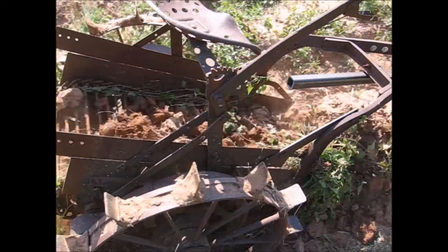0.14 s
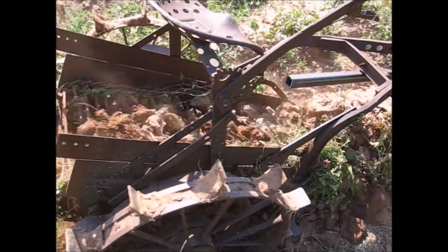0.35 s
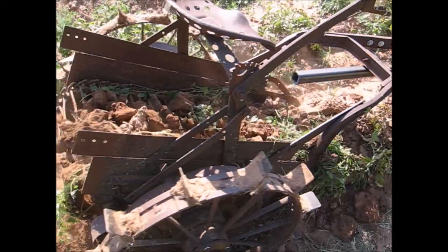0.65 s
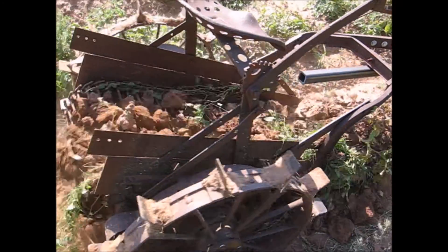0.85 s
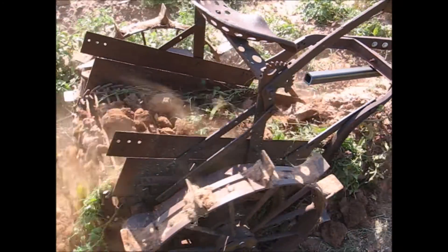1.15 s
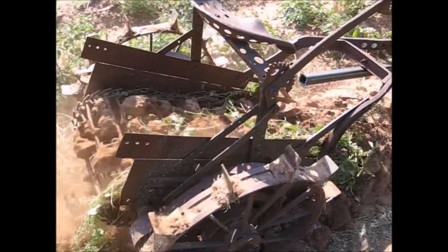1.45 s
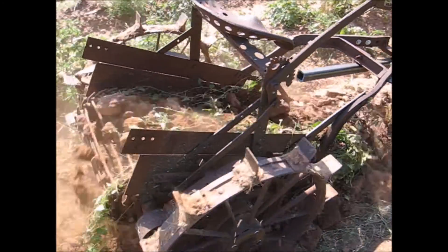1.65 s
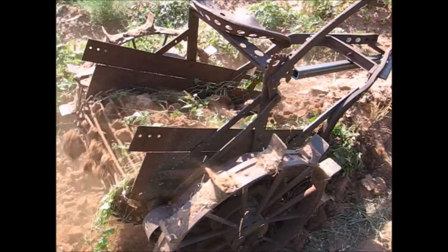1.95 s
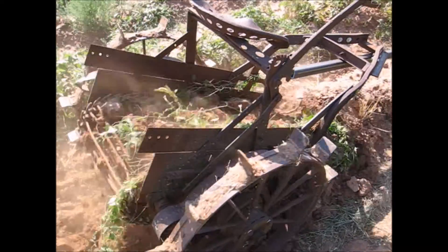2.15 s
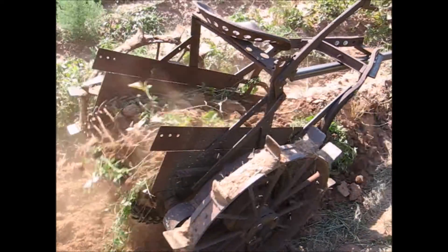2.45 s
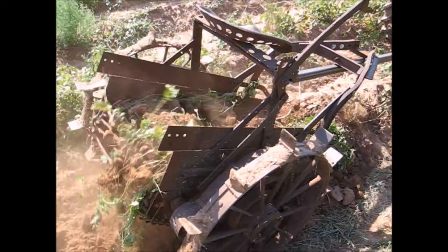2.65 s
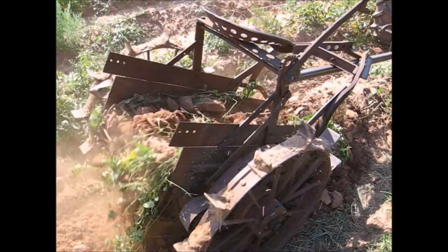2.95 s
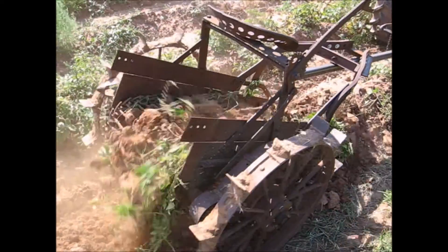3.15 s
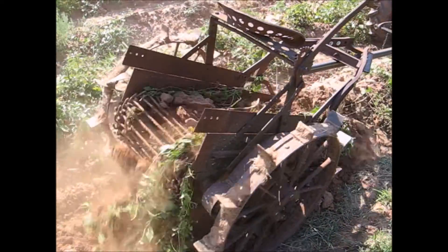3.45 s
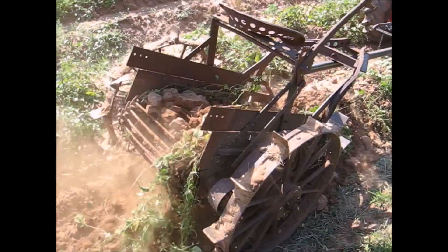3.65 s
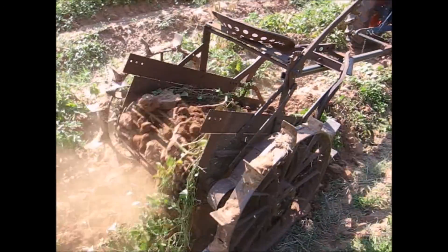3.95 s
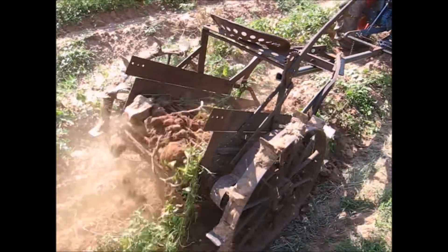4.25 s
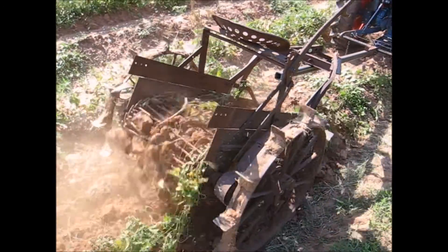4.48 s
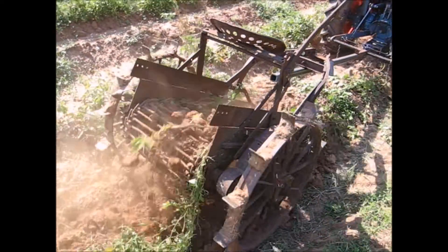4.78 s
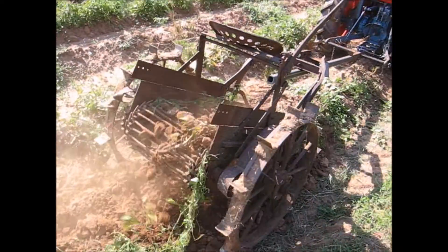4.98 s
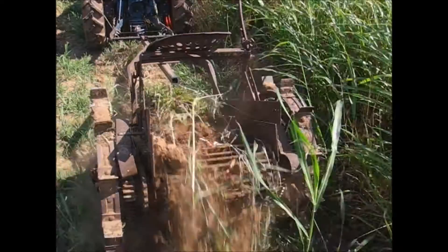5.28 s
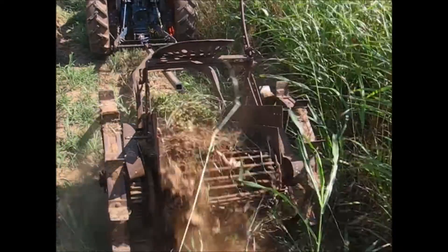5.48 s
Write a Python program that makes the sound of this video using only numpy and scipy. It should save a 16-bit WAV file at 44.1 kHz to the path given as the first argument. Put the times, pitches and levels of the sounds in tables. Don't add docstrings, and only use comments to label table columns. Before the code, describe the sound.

Gritty metallic chain rattle and irregular clanks, a shrill squeal returning with each wheel turn, low engine throb, wind rumble, then a closer view.

```python
import sys
import numpy as np
from scipy import signal
from scipy.fft import rfft, irfft, next_fast_len
from scipy.io import wavfile
from scipy.ndimage import uniform_filter1d, map_coordinates

SR = 44100
rng = np.random.default_rng(int(sys.argv[2]) if len(sys.argv) > 2 else 0)


def int16_out(signal):
    q = np.round(np.clip(np.atleast_2d(signal).T, -1, 1) * 32767)
    wavfile.write(sys.argv[1], SR, q.astype(np.int16))


def decibels_to_gain(level_db):
    exponent = np.asarray(level_db, float) / 20
    return 10 ** exponent


N = 247842
t = np.arange(N) / SR
CUT_S = 5.3069


def unit(x):
    return x / np.sqrt(np.mean(x ** 2) + 1e-20)


def curves(rows):
    times, *columns = np.transpose(rows)
    return [np.interp(t, times, column) for column in columns]


def wobble(rate):
    points = rng.standard_normal(int(N * rate / SR) + 4)
    return map_coordinates(points, [t * rate])


def filtered(x, response):
    m = next_fast_len(len(x))
    return irfft(rfft(x, m) * response(np.fft.rfftfreq(m, 1 / SR)), m)[:len(x)]


def coloured(x, points):
    hz, db = np.transpose(points)

    def response(f):
        return decibels_to_gain(np.interp(np.log(f + 1), np.log(hz), db, left=-90, right=-90))

    return unit(filtered(x, response))


def noise():
    return rng.standard_normal(N)


# (frequency [Hz], width [Hz], level [dB])
ROD_MODES = [(899, 38, 2), (1150, 80, -3), (1760, 45, -7.5), (2142, 120, 4.5), (2377, 77, 0.5),
             (2638, 65, 4.5), (2916, 37, 1), (3234, 65, 3.5), (3750, 60, -18.5), (3900, 160, -1.5),
             (4430, 43, -23), (4880, 65, -11)]


def rods(x, lean_db):
    f = np.fft.rfftfreq(next_fast_len(len(x)), 1 / SR)
    f = f[150 * len(x) // SR:6000 * len(x) // SR]
    response = 0
    for k, (centre, width, db) in enumerate(ROD_MODES):
        resonance = 1j * f * width / (centre * centre - f * f + 1j * f * width)
        response = response + (-1) ** k * decibels_to_gain(db + lean_db[k]) * resonance
    return filtered(x, lambda hz: np.interp(hz, f, response, left=0, right=0))


def chain(spectrum, level, grit, ring_db, spiky_db):
    spurts = decibels_to_gain(spiky_db * wobble(60) + 1.9 * wobble(400) + 2.4 * wobble(17))
    pebbles = (rng.random(N) < 110 / SR) * rng.uniform(0.17, 1, N)
    taps = signal.lfilter([1], [1, -.985], pebbles)
    soil = coloured((unit(spurts) + 0.42 * unit(taps) + 0.1) * noise(), spectrum)
    ring = np.zeros(N)
    for _ in range(4):
        knocks = noise() * decibels_to_gain(7.2 * np.clip(wobble(40), -2, 1.7))
        ring += unit(rods(knocks, 4.9 * rng.standard_normal(len(ROD_MODES))))
    rattle = soil + decibels_to_gain(ring_db) * unit(ring)
    top = filtered(rattle, lambda f: 1 / (1 + (3500 / (f + 1)) ** 10))
    return level * (rattle - top) + grit * unit(top)


# (frequency [Hz], level [dB per Hz])
SOIL_BESIDE = [(350, -12), (600, -0.5), (748, -1), (1670, -3.5), (1910, -9.5), (2160, -10), (3170, -10),
               (4540, -23.5), (4980, -19.5), (5410, -32), (7030, -59.5), (11900, -120)]
# (time [s], rattle level [dB])
SOIL_LOAD = [(0, -34.5), (.17, -26.5), (.27, -31.5), (.82, -33), (1.0, -26), (1.12, -33), (1.27, -29),
             (1.55, -33), (1.68, -26), (1.86, -33.5), (2.04, -31), (3.08, -33), (3.22, -26.5), (3.38, -35),
             (3.57, -26), (3.68, -33), (5.06, -32.5), (5.3, -36)]


def chain_beside(squeal_power):
    load_db, = curves(SOIL_LOAD)
    grit_db = -43.5 + 1.1 * (load_db - load_db.mean()) + 1.6 * wobble(14)
    grit = decibels_to_gain(grit_db) + decibels_to_gain(-31) * np.sqrt(squeal_power)
    return chain(SOIL_BESIDE, decibels_to_gain(load_db + 0.03), grit, ring_db=-6.5, spiky_db=0.5)


# (frequency [Hz], level [dB per Hz])
SOIL_REAR = [(88, -57), (150, -14), (308, -9), (353, -8), (513, -15), (545, -9.5), (855, -6), (1340, -12),
             (3200, -16), (4660, -16.5), (5410, -21.5), (7030, -59), (11900, -120)]


def chain_behind():
    return chain(SOIL_REAR, decibels_to_gain(-22), decibels_to_gain(-32.5), ring_db=-4.5, spiky_db=-1.0)


# (time [s], peak level [dB], ringing rod [Hz], brightness [dB])
LINK_BLOWS = [(0.1533, -6.5, 2080, -14), (0.2098, -20.5, 1076, -23), (0.2862, -18, 2590, -15.5),
              (0.334, -14.5, 1108, -18), (.602, -14, 1153, -15), (0.6693, -15, 1124, -15.5),
              (0.915, -6, 2650, -10.5), (0.9735, -13, 2555, -13), (1.0775, -22.5, 817, -23.5),
              (1.1444, -28.5, 916, -12.5), (1.5594, -26.5, 936, -2.5), (1.6462, -8, 3120, -6.5),
              (1.698, -13, 3024, -8), (1.7911, -15, 823, -17.5), (2.0004, -11, 1018, -14),
              (2.381, -17, 940, -20), (2.4236, -18.5, 2880, -14), (2.4685, -10, 843, -16),
              (2.8883, -22.5, 870, -20), (3.1652, -16.5, 874, -15), (3.5567, -20.5, 2384, -16),
              (3.6052, -23, 2360, -7.5), (3.9758, -13, 1760, -25), (4.017, -17, 856, -17),
              (4.2109, -12, 3170, -21.5), (4.2997, -25.5, 1260, -2.5), (4.6311, -11, 2488, -12.5),
              (4.965, -11, 3064, -10), (5.5129, -20.5, 3270, -12.5), (5.5807, -15.5, 827, -6)]
# (time [s], peak level [dB], ringing rod [Hz], thud [dB])
STONE_BLOWS = [(.1096, -20, 2120, -0.5), (.5541, -17, 1080, 3), (1.0144, -18, 1188, 0),
               (1.047, -22.5, 797, 5.5), (1.4044, -20.5, 1150, -1), (1.4411, -19, 1072, 2.5),
               (2.0438, -17.5, 1080, 8), (2.3374, -15.5, 938, 4), (2.8594, -16.5, 982, 1.5),
               (3.0964, -26.5, 1005, 0), (3.2375, -17.5, 987, -3), (3.5039, -13, 1097, -1.5),
               (3.6874, -26, 865, 4), (3.7758, -29.5, 920, -3), (3.9114, -18.5, 794, -3),
               (4.0814, -30, 810, 0.5), (4.3515, -21, 914, 6.5), (4.721, -17.5, 866, -10.5),
               (5.0315, -19, 780, 6), (5.0739, -20.5, 930, 3.5), (5.1168, -23.5, 820, 6),
               (5.3767, -10, 879, 0)]


def clanks():
    out, u = np.zeros(N + SR), t[:SR // 8]
    grain = decibels_to_gain(2.5 * wobble(500))
    thud = coloured(noise() * grain, [(450, -12), (750, -1), (1500, 1.5), (2000, -18.0)])
    body = coloured(noise() * grain, [(1300, -8.0), (1800, 3), (3400, 1.0), (4200, -19)])
    bright = coloured(noise() * grain, [(3000, -25.5), (3700, 3.0), (5400, -4.0), (6500, -16.0)])
    blows = [(s, db, hz, -5.5, bright_db) for s, db, hz, bright_db in LINK_BLOWS]
    blows += [(s, db, hz, thud_db, -19.5) for s, db, hz, thud_db in STONE_BLOWS]
    for s, db, hz, thud_db, bright_db in blows:
        start = round(s * SR)
        hit = slice(start, start + len(u))
        grit = body[hit] + decibels_to_gain(thud_db - 0.5) * thud[hit] + decibels_to_gain(bright_db + 8.5) * bright[hit]
        v = u[:len(grit)]
        rise = 1 - np.exp(-v / .0004)
        fade = decibels_to_gain(-60 * v / 0.02) + 0.53 * decibels_to_gain(-60 * v / 0.15)
        swell = 1 - np.exp(-v / 0.0081)
        ring = decibels_to_gain(-3.5 - 60 * v / 0.084) * swell * np.sin(2 * np.pi * hz * v)
        out[hit][:len(v)] += decibels_to_gain(db - 9.5) * (grit * rise * fade + 2.5 * ring)
    every_rod = rods(out, np.zeros(len(ROD_MODES)))
    return out[:N] + 1.1 * every_rod[:N]


def squeal(spans, rough):
    out, hz = np.zeros(N), np.zeros(N)
    for rows in spans:
        times, pitches, levels_db = np.transpose(rows)
        inside = slice(round(times[0] * SR), round(times[-1] * SR))
        level = decibels_to_gain(np.interp(t[inside], times, levels_db))
        pitch = np.interp(t[inside], times, pitches)
        hz[inside] = np.where(level > out[inside], pitch, hz[inside])
        out[inside] = np.maximum(level, out[inside])
    hz = np.where(out > 0, hz, spans[0][1][1]) + 25 * rough * wobble(160)
    grip = uniform_filter1d(out, size=100)
    loose = 1 / (1 + (grip / 0.35) ** 2)
    grip = grip * decibels_to_gain(6.1 * loose * np.sqrt(rough) * wobble(110))
    scrape = 1 + loose * (0.19 * wobble(500) + 0.15 * wobble(2400))
    return np.sqrt(2) * grip * scrape * np.sin(2 * np.pi * np.cumsum(hz) / SR)


# (time [s], hold [s], frequency [Hz], level [dB], fade over the hold [dB])
BEARING_LOCKS = [(0.419, .012, 3977, -22, 0.5), (0.434, 0.018, 3923, -8.5, 0), (.457, .032, 3796, -6, 0.5),
                 (0.507, .05, 3927, -16.5, 23), (1.172, .006, 4070, -19, 1.5), (1.18, .028, 3945, -8, 3.5),
                 (1.21, .02, 3810, -10, 9), (1.241, 0.026, 3846, -16.5, 1), (1.26, .038, 3993, -16.5, -3.5),
                 (1.307, 0.024, 3980, -13, 7), (1.326, .17, 3980, -21, 23.5),
                 (1.858, .007, 3893, -20, -2.5), (1.87, 0.032, 3767, -7, 0.5), (1.908, .024, 3790, -13, 8),
                 (1.945, .03, 3800, -20.5, 11.5), (2.534, .03, 3900, -41.5, 2.5),
                 (2.588, .07, 3916, -5.5, 3), (2.665, .04, 3980, -15, 8), (2.72, .02, 3933, -9, 10),
                 (2.756, 0.04, 3960, -33, 15.5), (3.388, 0.041, 3928, -10, 6.5),
                 (3.439, .04, 4025, -18, 14.5), (3.492, 0.045, 3953, -15.5, 24.5)]
# (frequency [Hz], roughness, [(time [s], peak level [dB], release [s])])
WEAK_CATCHES = [
    (3470, 1, [(.5, -23.5, .02), (1.312, -30, .02), (2.675, -23.5, 0.072)]),
    (3140, 1, [(.437, -28, .012), (1.22, -23.5, 0.028), (1.89, -33, .03), (2.66, -27.5, .016), (3.403, -31, 0.037)]),
    (4800, 2.5, [(.486, -37, 0.013), (1.303, -26.5, .026), (2.667, -35, .024), (3.421, -31, .012)]),
]


def bearing():
    grab_s, slip_s, edge_db = 0.01, .008, 21
    low, high = [], []
    for s, hold, hz, db, fade_db in BEARING_LOCKS:
        end, end_db = s + hold, db - fade_db
        rows = [(s - grab_s, hz + 50.4, db - edge_db), (s, hz, db),
                (end, hz, end_db), (end + slip_s, hz, end_db - edge_db)]
        (high if hz > 3870 else low).append(rows)
    strong = squeal(high, rough=.3) + squeal(low, rough=.3)
    weak = np.zeros(N)
    for hz, rough, catches in WEAK_CATCHES:
        spans = [[(s - .016, hz, db - 11), (s, hz, db), (s + release, hz, db - 11)]
                 for s, db, release in catches]
        weak += squeal(spans, rough)
    return decibels_to_gain(0.3) * strong + decibels_to_gain(-4.0) * weak


# (frequency [Hz], level [dB per Hz])
RUB_TONE = [(2700, -25.5), (3100, 0), (3600, -1), (4300, -5), (4700, -25.5)]


def dry_rub(squeal_power):
    return decibels_to_gain(-25.5 + 3.5 * wobble(70)) * squeal_power ** 0.27 * coloured(noise(), RUB_TONE)


# (time [s], frequency [Hz], peak level [dB])
ROD_PINGS = [
    (1.012, 4880, -24),
    (1, 4800, -30.5),
    (2.2, 6100, -27),
    (4.302, 4850, -28.5),
    (5.07, 2900, -28.5),
    (2.002, 3290, -25.5),
    (3.555, 2370, -24),
]


def pings():
    out, u = np.zeros(N), t[:SR // 8]
    for s, hz, db in ROD_PINGS:
        pair = np.sin(2 * np.pi * hz * u) + .6 * np.sin(2 * np.pi * 1.03 * hz * u)
        fade = decibels_to_gain(db - 60 * u / 0.24 * max(1, hz / 2200))
        out[round(s * SR):][:len(u)] += fade * (1 - np.exp(-u / 0.00079)) * pair
    return out


# (time [s], frequency [Hz], level [dB])
ROD_CREAK = [
    (1.392, 1261, -38.5),
    (1.416, 1134, -23.5),
    (1.433, 1442, -25.5),
    (1.445, 1141, -24),
    (1.462, 1220, -27.5),
    (1.475, 1280, -36),
]


def creak():
    upper = [(s, 2360, db - 7) for s, hz, db in ROD_CREAK]
    return squeal([ROD_CREAK], rough=.25) + squeal([upper], rough=1.2)


# (time [s], gust strength [dB], share of large eddies [dB])
GUSTS = [(0, -21.5, -1.5), (.35, -19, 0), (.81, -24, -0.5), (1.24, -12.5, 2.5), (1.53, -31.5, -1),
         (1.8, -14.5, 3.5), (2.12, -19.5, -1), (2.19, -19.5, 1), (2.46, -18.5, 1.5), (2.72, -14.5, -1),
         (3.13, -21, -2), (3.26, -12.5, 1.5), (3.39, -27.5, -3.5), (3.62, -16.5, -1), (4.13, -17, 2),
         (4.3, -21.5, -5.5), (4.38, -14.5, -0.5), (5.3, -17, 1)]
# (frequency [Hz], level [dB per Hz])
LARGE_EDDIES = [(8.8, -26), (15, -5), (70, 3.5), (130, -3.5), (170, -29.5), (290, -120)]
MIDDLE_EDDIES = [(60, -32), (110, 1.5), (200, 1), (330, -5), (500, -16.5), (900, -47.5)]
SMALL_EDDIES = [(200, -26), (330, 0.5), (550, -4.5), (800, -8.5), (1400, -19.5), (2400, -37.5),
                (4000, -50.5)]


def wind():
    gust_db, large_db = curves(GUSTS)
    calm_db = -20
    rumble_db = -18 + large_db + 1.0 * wobble(9)
    buffet_db = gust_db + 0.99 * wobble(11)
    flutter_db = calm_db - 8 + 1.4 * (buffet_db - calm_db) + 1.9 * wobble(8)
    eddies = wobble(45)
    rumble = coloured(noise() * decibels_to_gain(0.48 * wobble(33)), LARGE_EDDIES) * decibels_to_gain(0.3 * eddies)
    buffet = coloured(noise() * decibels_to_gain(2.2 * eddies + 1.6 * wobble(90)), MIDDLE_EDDIES)
    flutter = coloured(noise() * decibels_to_gain(3.0 * eddies + 4.0 * wobble(160)), SMALL_EDDIES)
    return decibels_to_gain(rumble_db) * rumble + decibels_to_gain(buffet_db) * buffet + decibels_to_gain(flutter_db) * flutter


# (multiple of half the firing rate, level [dB])
ENGINE_ORDERS = [(1, -1.5), (2, 0), (3, -11.5), (4, 0), (5, -28.5), (6, -8), (7, -16.5), (8, -19.5),
                 (9, -16), (10, -11.5)]


def engine():
    firing_hz = 39.32
    turn = np.pi * firing_hz * (t - 5.333) + 0.12 * wobble(14)
    throb = sum(decibels_to_gain(db) * np.cos(k * turn - .25 * k) for k, db in ENGINE_ORDERS)
    return unit(decibels_to_gain(1.4 * wobble(11)) * throb)


# (frequency [Hz], level [dB per Hz])
EXHAUST_TONE = [(15, -14), (30, 3.5), (60, -7), (120, 5), (200, -19), (400, -17.5)]


def exhaust():
    return decibels_to_gain(-31) * coloured(noise(), EXHAUST_TONE)


def scene():
    throb = engine()
    squeals = bearing()
    power = np.abs(uniform_filter1d(squeals ** 2, size=1100))
    duck = 1 / np.sqrt(1 + power / 0.055)
    rest = chain_beside(power) + wind() + decibels_to_gain(-23) * throb
    beside = squeals + duck * rest + dry_rub(power)
    behind = chain_behind() + decibels_to_gain(-18.5) * throb + exhaust()
    mix = np.where(t < CUT_S, beside, behind) + clanks() + pings() + creak()
    return mix[None]


def shot(x):
    x = np.pad(x, 4096, mode="reflect")
    loud = np.sqrt(np.abs(uniform_filter1d(x * x, size=900)))
    x = 1.224 * x / (1 + (loud / 0.49) ** 2) ** 0.43
    x = x / (1 + np.abs(x / 0.92) ** 4) ** .25
    return filtered(x, lambda f: 1 / (1 + (f / 5400) ** 44) * (f < 5560))[4096:-4096]


def roll_off(x):
    return signal.sosfilt(signal.butter(12, 16000, fs=SR, output="sos"), x)


def record(dry):
    cut = round(CUT_S * SR)
    first, second = shot(dry[0, :cut]), shot(dry[0, cut:])
    first = first + (.16 - first[0]) * np.exp(-t[:cut] / .003)
    landing = first[-1] - .55 * np.sign(first[-1])
    second = second + (landing - second[0]) * np.exp(-t[:N - cut] / .002)
    mix = np.concatenate([first, second])[None] + .002
    return roll_off(mix)


dry = scene()
out = record(dry)
int16_out(out)
```